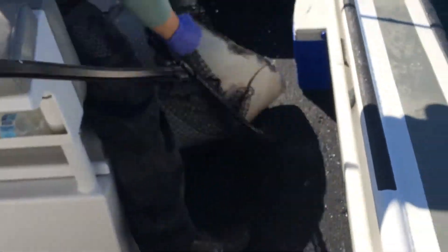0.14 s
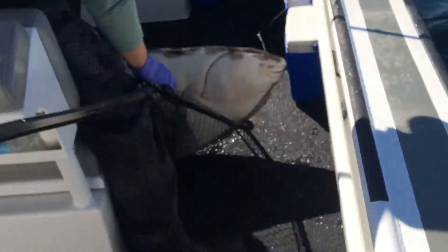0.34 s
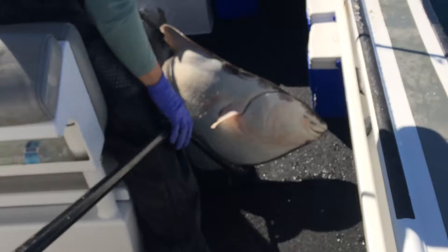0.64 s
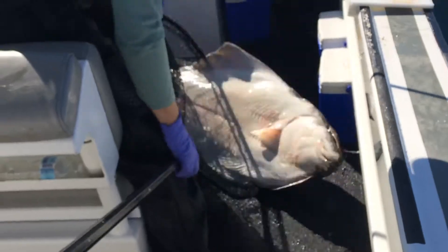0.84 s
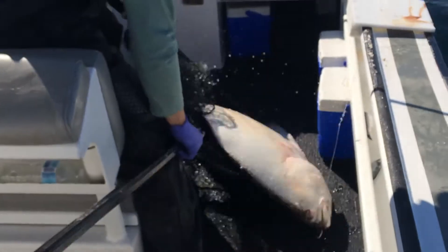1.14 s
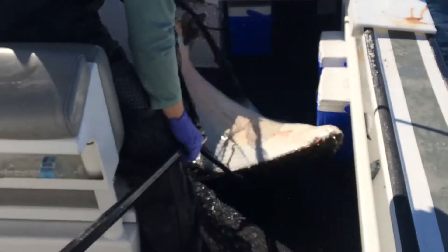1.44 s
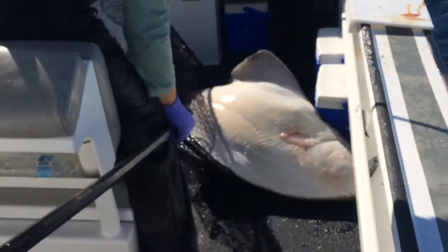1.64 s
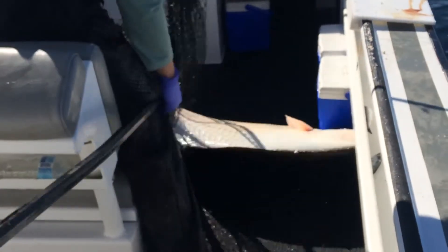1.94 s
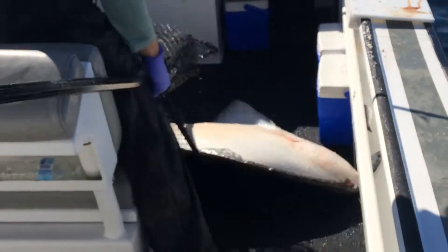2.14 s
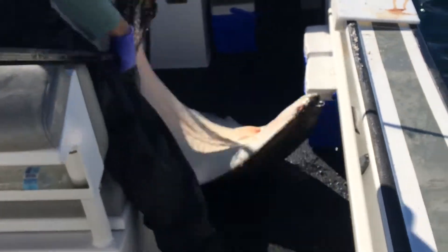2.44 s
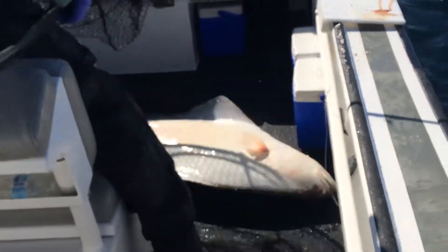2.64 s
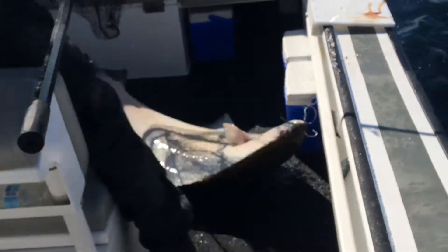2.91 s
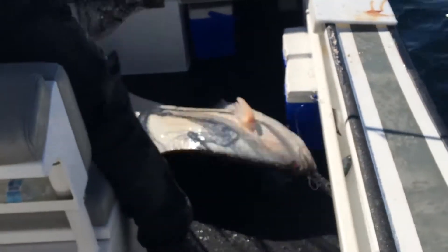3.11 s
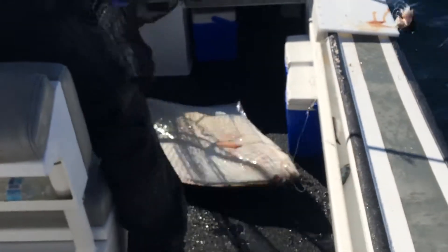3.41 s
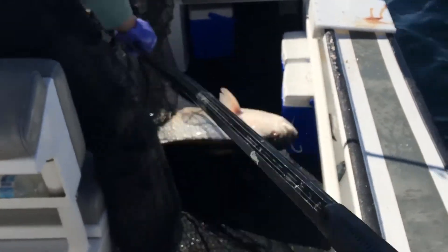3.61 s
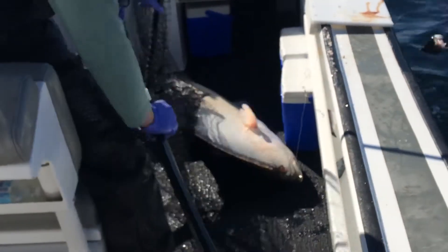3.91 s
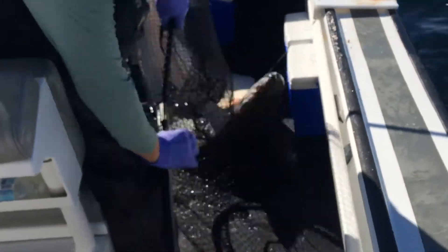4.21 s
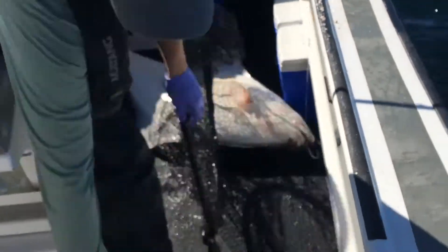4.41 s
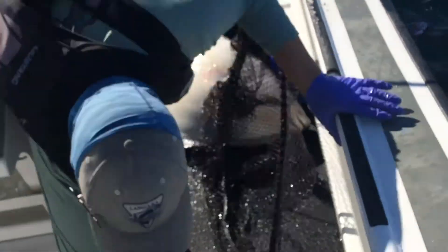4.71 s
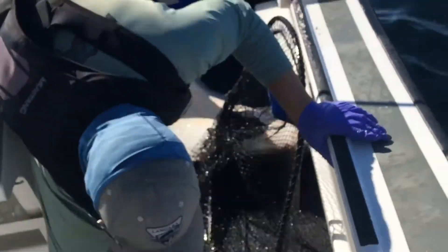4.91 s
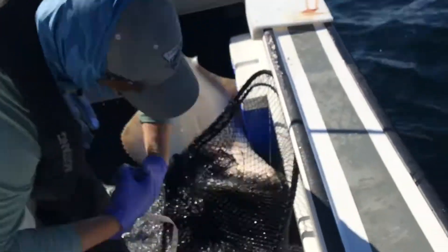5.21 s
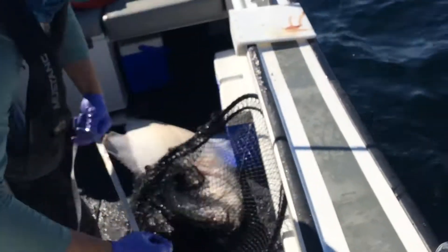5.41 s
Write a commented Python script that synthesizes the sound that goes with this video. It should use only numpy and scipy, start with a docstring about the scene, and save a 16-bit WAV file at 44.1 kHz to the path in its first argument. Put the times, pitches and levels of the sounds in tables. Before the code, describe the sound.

A large wet fish struggles on a small boat's hollow deck, heard close, with short cockpit reflections. It opens at once with a thump, knock and mesh rub, then quick wet slaps from 0.1 to 0.5 s, the net's metal hoop rattling thinly and fading by about 1 s. A bright, splashy slap lands at 1.1 s, followed by heavy thuds around 1.2 and 1.5 s, and uneven slaps, hollow knocks and slithers through 2.3 s. A tight cluster hits at 2.7 s, then a brief lull with drips and soft water wash. Thumps resume at 3.2 s; the hardest slap cracks at about 3.76 s. Paired hollow knocks come at 4.1 s, and a dense, booming flurry at 4.4 to 4.6 s. Afterwards activity thins: a slap near 4.85 s, a double knock at 5.2 s, a last dull bump at 5.4 s, with light rubbing and low hull rumble.

```python
"""Fish thrashing in a landing net

A large wet fish thrashes on the deck of a small boat, heard from close by. Tail slaps are bursts of
shaped noise and grains; the body thumps the hollow deck as damped modes and slithers as rubbing grains.
The net's metal hoop and loose gear ring as modes; water patters down, the sea and hull are shaped noise.
The cockpit walls answer with short noise tails, and a limiter holds the loudest blows."""
import sys
import numpy as np
from scipy import signal
from scipy.fft import rfft, irfft, next_fast_len
from scipy.io import wavfile
from scipy.ndimage import uniform_filter1d, minimum_filter1d, map_coordinates

SR = 44100
rng = np.random.default_rng(int(sys.argv[2]) if len(sys.argv) > 2 else 0)


def pcm_store(signal):
    """Save signal as 16-bit PCM."""
    levels = np.round(np.clip(np.atleast_2d(signal), -1, 1) * 32767)
    wavfile.write(sys.argv[1], SR, levels.astype(np.int16).T)


N = 244755  # length in samples

# Wet slaps of tail and fins: above 0 dB of wetness a bright wet flick, below 0 a dull flat blow.
# Each row: start in seconds, strength in dB, wetness in dB.
SLAPS = [(.119, -26, 6), (0.1915, -19.5, 4.5), (.214, -15.5, 3.5), (.312, -18.5, -7.5), (.321, -20.5, -10),
         (.401, -16, 3), (.453, -22.5, 1), (.48, -22.5, 2.5), (.698, -20, 0.5), (1.008, -14.5, 2.5),
         (1.117, -10, 8), (1.176, -18, -1.5), (1.203, -16, 0), (1.425, -16, -5.5), (1.456, -24.5, -6.5),
         (1.549, -19.5, 0), (1.6, -24.5, 3), (1.706, -22, 1), (1.808, -20, -3), (1.941, -19.5, 5.5),
         (2.025, -26, 4.5), (2.116, -19, 7.5), (2.123, -18.5, -4), (2.163, -35.5, 9.5), (2.269, -15, -2.5),
         (2.297, -21, -6.5), (2.509, -34, 8), (2.661, -29, 9.5), (2.7, -19, 4.5), (2.713, -15.5, 6),
         (2.723, -15.5, -4), (3.2206, -15.5, -1.5), (3.315, -28.5, 0.5), (3.382, -37, 1),
         (3.429, -17.5, -1), (3.441, -20.5, -5.5), (3.626, -37, 1.5), (3.717, -32, 5), (3.7579, -7, 2),
         (3.937, -22.5, -5), (4.062, -26, -1), (4.141, -28, 1.5), (4.408, -25.5, -6.5), (4.444, -20.5, 3),
         (4.475, -19, 0), (4.5251, -14, -2), (4.589, -20, -0.5), (4.843, -18.5, 2), (5.183, -24.5, -3.5),
         (5.402, -26, -1.5)]
# Colour of a crackling water film. Each row: frequency in Hz, relative level in dB per Hz.
CRACKLE = [(1000, -6), (2000, 2), (4000, 2), (7400, 1), (10000, -6.5), (16000, -16)]


def amp(db):
    """Decibels to gain."""
    return 10 ** (np.asarray(db) / 20)


def unit(x):
    """Scale to rms 1."""
    return x / np.sqrt(np.mean(x ** 2) + 1e-20)


def along(points, hz):
    """(Hz, value) points read on a log frequency axis."""
    f, v = np.transpose(points)
    return np.interp(np.log(hz + 1), np.log(f), v)


def wobble(knots, size):
    """A smooth random curve through about so many knots."""
    return map_coordinates(rng.standard_normal(int(knots) + 4), [np.linspace(1, knots + 1, size)])


def coloured(x, spectrum, uneven_db=0):
    """x given a spectrum with random humps and dips, at rms 1."""
    hz = np.fft.rfftfreq(len(x), 1 / SR)
    # humps evenly spaced on a square-root frequency axis
    humps = np.interp(np.sqrt(hz), np.linspace(0, np.sqrt(SR / 2), 512), wobble(110, size=512))
    gain = amp(along(spectrum, hz) + uneven_db * np.tanh(humps))
    return unit(irfft(rfft(x) * gain, len(x)))


def grains(size, per_second, spread_db):
    """Tiny random clicks of unequal size, at rms 1."""
    sizes = rng.standard_normal(size) * amp(spread_db * np.minimum(rng.exponential(size=size), 4))
    return unit(sizes * (rng.random(size) < per_second / SR))


def blow(t, rise, t60):
    """An envelope that rises quickly and dies away, by 60 dB in t60 seconds."""
    return (1 - np.exp(-t / max(rise, 1e-4))) * np.exp(-np.log(1000) * t / max(t60, 1e-3))


def ring(modes, t, rise, vary_db):
    """Damped modes of (Hz, dB, t60 s), each at a new strength and phase."""
    total = 0
    for hz, db, t60 in modes:
        strength = amp(db + vary_db * rng.normal())
        total = total + strength * blow(t, rise, t60) * np.sin(2 * np.pi * (hz * t + rng.random()))
    return total


def add(track, s, sound):
    """Mix a sound into the track at time s."""
    part = track[max(round(s * SR), 0):][:len(sound)]
    part += sound[:len(part)]


def sea():
    """Water washes softly round the boat: shaped noise whose level drifts."""
    # Colour of the wash. Each row: frequency in Hz, relative level in dB per Hz.
    wash_colour = [(25, -8), (100, 5.5), (250, -2), (500, -24), (1300, -20), (4000, -27), (9000, -34),
                   (16000, -44)]
    level = amp(-38 + 1.2 * wobble(4 * N / SR, N))
    return level * coloured(rng.standard_normal(N), wash_colour)


def hull():
    """The hollow hull rumbles under the shifting weight of fish and boots."""
    # How the rumble swells and sinks. Each row: time in seconds, level in dB before the overall gain.
    weight_shifts = [(0.0, -27.5), (0.32, -25), (0.88, -31.5), (1.65, -34), (2.09, -37), (2.29, -24),
                     (2.75, -36), (2.87, -34), (3.07, -43.5), (3.2, -36), (3.37, -26.5), (3.99, -33),
                     (4.22, -46), (4.47, -31), (4.61, -27), (4.74, -24.5), (5.38, -37.5), (5.55, -32)]
    # Colour of the rumble. Each row: frequency in Hz, relative level in dB per Hz.
    rumble_colour = [(22, -22), (50, -23.5), (85, -0.5), (130, 3), (220, -1.5), (300, -13.5), (420, -21.5),
                     (800, -18.5), (2000, -56)]
    overall_db = 1.5
    rumble_db = np.interp(np.arange(N) / SR, *np.transpose(weight_shifts))
    return amp(rumble_db + overall_db) * coloured(rng.standard_normal(N), rumble_colour)


def cockpit(x):
    """Close walls return a short diffuse answer that changes as the fish moves about."""
    # Decay of the answer. Each row: frequency in Hz, t60 in seconds.
    wall_decay = [(100, 0.65), (400, 0.4), (1500, 0.23), (5000, 0.14), (14000, 0.14)]
    out, size = np.zeros(N), SR // 3  # a new answer three times a second
    for start in range(0, N, size):
        hz, t, bands = signal.stft(rng.standard_normal(SR // 2), SR, nperseg=256)
        fade = np.exp(-np.log(1000) * t / along(wall_decay, hz)[:, None])
        tail = signal.istft(bands * fade, SR, nperseg=256)[1]
        answer = signal.fftconvolve(x[start:start + size], tail / np.linalg.norm(tail))
        add(out, start / SR + .005, answer)
    return out


def drips():
    """Every slap throws up water, which patters down; the soaked net lets single drops fall all along."""
    shower_db, shower_t60_s = -25, 0.52  # level relative to the slap's strength
    drops_per_s, drop_db = 14, -61
    now, t = np.arange(N) / SR, np.arange(SR // 20) / SR
    # the showers of all slaps add as power
    power = sum(amp(2 * db) * blow(np.maximum(now - s, 0), 0.036, shower_t60_s) ** 2
                for s, db, wet_db in SLAPS)
    shower = amp(shower_db) * np.sqrt(power) * coloured(grains(N, 2500, 2.5), CRACKLE)
    tick = rng.standard_normal(len(t)) * blow(t, .0005, .03)
    falls = grains(N, drops_per_s, 0.6)
    drops = coloured(signal.fftconvolve(falls, tick)[:N], CRACKLE)
    return shower + amp(drop_db) * drops


def hoop():
    """The metal tube of the net chatters against mesh and fish, and every small contact rings it."""
    # Modes of the tube. Each row: frequency in Hz, relative level in dB, t60 in seconds.
    tube_modes = [(756, -2, 0.17), (844.5, 1, 0.19), (952, 3, 0.1), (1436, -6.5, .12), (1940, -6, 0.16),
                  (2550, -11.5, .1), (3840, -13, 0.4)]
    # slaps ring the hoop while the fish lies against it, ever less once it slips out
    from_s, slips_out_s, clear_s = .2, 0.54, 1.05
    hoop_db, fade_db_per_s = 3.5, 40
    # mesh and skin are soft, so they stir the tube's high modes less
    soft_filter = signal.butter(1, 1200, fs=SR, output="sos")  # low-pass, in Hz
    out, t = np.zeros(N), np.arange(SR // 2) / SR
    for s, strength_db, wet_db in SLAPS:
        if not from_s < s < clear_s:
            continue
        db = strength_db + hoop_db - fade_db_per_s * max(s - slips_out_s, 0)
        chatter = grains(len(t), 900, 1.8) * blow(t, 0.00043, 0.25)
        chatter = signal.sosfilt(soft_filter, chatter)
        # the changing pull of the mesh detunes the tube a little
        clock = np.cumsum(1 + .025 * wobble(50, len(t))) / SR
        ringing = ring(tube_modes, clock, rise=0.00042, vary_db=2.5)
        tube = signal.fftconvolve(chatter, ringing)[:len(t)]
        add(out, s, amp(db - 14) * unit(tube))
    return out


def knocks():
    """Gear on the hull: short hollow notes with a few unrelated overtones, in a dull puff of noise."""
    # Hollow knocks and small ticks. Each row: start in seconds, relative level in dB, nominal pitch in Hz.
    gear_hits = [(.001, -3.5, 576), (.312, -6, 922), (.344, -6, 660), (.525, -14.5, 410),
                 (0.597, -9.5, 565), (1.007, -7, 1057), (1.21, -3.5, 710), (1.423, 0.5, 474),
                 (1.6, -22, 430), (1.687, -9, 428), (1.815, -9.5, 702), (1.97, -7, 644), (2.03, -19, 410),
                 (2.27, -7.5, 726), (2.31, -6.5, 480), (2.507, -16.5, 458), (3.626, -20.5, 2136),
                 (3.939, -14, 1212), (3.959, -12, 486), (4.019, -24, 2410), (4.097, -2.5, 511),
                 (4.103, 0, 601), (4.234, -21.5, 2420), (4.474, -4, 446), (4.527, -6, 1386),
                 (5.183, -5, 590), (5.191, -4.5, 426)]
    puff_colour = [(120, -11), (300, -1.0), (600, -9.0), (1400, -15), (2200, -24), (5000, -45)]  # (Hz, dB)
    t60 = 0.087  # base decay in seconds, scaled for each part
    out, t = np.zeros(N), np.arange(SR // 2) / SR
    for s, db, hz in gear_hits:
        modes = [(hz, 0, t60 * 0.87), (hz * .76, -7, t60), (hz * 1.2, -6, t60),
                 (hz * 1.7, -10, t60 * 0.24), (hz * 1.9, -15, t60 * .5)]
        # loose gear shifts as it rings, so the note wavers
        clock = np.cumsum(1 + .11 * wobble(70, len(t))) / SR
        note = ring(modes, clock, rise=0.00051, vary_db=3.5)
        puff = coloured(rng.standard_normal(len(t)), puff_colour, uneven_db=12.0)
        puff = amp(-3.5) * puff * blow(t, 0.00031, t60 * 1.11)
        add(out, s, amp(db - 6.5) * (note + puff))
    return out


def slides():
    """Each slide swells and fades: mesh rubs in small slips, the water film crackles more if it is wet."""
    # Fish and mesh sliding over the wet deck.
    # Each row: start in seconds, length in seconds, strength in dB, wetness in dB.
    slithers = [(0, .12, -24, -2), (0.222, 0.098, -26, -0.5), (0.595, 0.26, -33, -7.5),
                (0.683, 0.12, -23.5, 0.5), (0.731, 0.12, -23, -3.5), (0.875, 0.15, -28.5, -1),
                (0.941, 0.25, -38.5, 1), (1.171, 0.1, -24, -2.5), (1.269, 0.12, -47, -7.5),
                (1.438, 0.094, -37, -14), (1.751, 0.13, -36.5, -2.5), (2.281, 0.15, -39, -11),
                (2.548, .2, -29, -2), (2.716, 0.12, -27, -1), (2.882, 0.077, -56.5, -17),
                (3.147, 0.16, -41.5, -4), (3.215, 0.11, -25, -5.5), (3.66, 0.056, -38.5, 2),
                (3.865, 0.042, -30.5, 2), (3.917, 0.1, -31, 0), (4.409, 0.2, -24.5, -0.5),
                (4.525, 0.21, -29.5, -3), (4.786, 0.03, -39, -4), (4.897, 0.082, -36, 0),
                (5.111, 0.068, -37.5, -0.5), (5.242, .12, -39.5, 7.5), (5.361, 0.14, -33, -3.5)]
    # Colour of the rubbing mesh. Each row: frequency in Hz, relative level in dB per Hz.
    rub_colour = [(130, 7), (260, -11.5), (500, -4.5), (850, -2.5), (1200, -6.5), (2000, -9), (3200, -17.5),
                  (6000, -48)]
    swell = 0.51  # share of a slide spent speeding up
    out, t = np.zeros(N), np.arange(SR // 2) / SR
    for start, length, db, wet_db in slithers:
        speed = np.interp(t / length, [0, swell, 1], [0, 1, 0]) ** 1.06
        slips = amp(2.2 * wobble(60, len(t)))
        rub = amp(db - wet_db) * coloured(grains(len(t), 1500, 0.57), rub_colour, uneven_db=5)
        crackle = amp(db + wet_db) * coloured(grains(len(t), 4000, spread_db=2), CRACKLE, uneven_db=8)
        add(out, start, speed * slips * (rub + crackle))
    return out


def thumps():
    """The heavy body drives the panel under it, then settles; its load shifts the deck's ringing modes."""
    # The body landing on the deck. Each row: start in seconds, relative level in dB, nominal panel pitch in Hz.
    landings = [(.001, -5.5, 326.4), (.228, -6.5, 155), (.247, -9.5, 122), (.413, -8.5, 120.6),
                (.694, -12, 149.5), (.793, -14, 138), (1.124, -11, 294), (1.198, -4.5, 210.7),
                (1.221, -6.5, 127), (1.454, -3, 229.6), (1.495, -4.5, 153.5), (1.711, -3, 308.5),
                (1.818, -12, 163), (2.027, -10.5, 288), (2.122, -10.5, 208), (2.293, -1, 224.5),
                (2.45, -15.5, 151), (2.629, -9, 209), (2.7, -5, 110.7), (2.726, -1, 287),
                (3.226, -2.5, 140), (3.289, -6, 123), (3.423, -11, 129), (3.766, -3, 125),
                (4.102, -10.5, 245), (4.44, -10, 216), (4.479, 2, 202), (4.497, -2, 212.4),
                (4.604, -8.5, 96.5), (4.858, -14.5, 88), (5.183, -18.5, 248), (5.411, -12.5, 131)]
    # Modes of the rest of the deck. Each row: frequency in Hz, relative level in dB, t60 in seconds.
    deck_modes = [(77.6, -19.5, 0.16), (101, -23, 0.49), (117, -8.5, 0.16), (168, -2.5, 0.18),
                  (184.4, -2, 0.23), (219.4, 1.5, 0.3), (273.8, -12.5, 0.76), (326.3, -10, 0.35),
                  (382.5, -8.5, 0.24)]
    # Modes of the whole hull. Each row: frequency in Hz, relative level in dB, t60 in seconds.
    hull_modes = [(49, -15, 0.18), (76, -2.5, 0.41), (90, 5.5, 0.075)]
    flesh_colour = [(30, -46), (80, -26), (150, 7.0), (330, 6.0), (600, -4.5), (1400, -44.5)]  # (Hz, dB)
    # after each landing the rest of the fish settles: a later, softer bump at about this pitch
    settle_s, settle_db, settle_hz = .045, -8.5, 163.4
    # the hull's boom under a panel at settle_hz; stiffer, higher panels pass on less
    boom_db, boom_db_per_octave = -13, -12
    out, t = np.zeros(N), np.arange(SR // 2) / SR
    settling = [(s + settle_s, db + settle_db, settle_hz * np.exp(0.121 * rng.normal()))
                for s, db, hz in landings]
    for s, db, hz in landings + settling:
        pitch = hz * (1 + 0.027 * np.exp(-t / 0.022) + 0.094 * wobble(37.7, len(t)))
        panel = np.sin(2 * np.pi * np.cumsum(pitch) / SR) * blow(t, 0.001, t60=0.17)
        load = 1 + 0.0436 * rng.normal()  # the weight lies on another spot each time
        deck = amp(-13.5) * ring(deck_modes, t * load, rise=0.0019, vary_db=5.5)
        boom_gain = amp(boom_db + boom_db_per_octave * np.log2(hz / settle_hz))
        heaviness = min(amp(db), 1)  # light falls move the whole hull far less
        boom = boom_gain * heaviness * ring(hull_modes, t, rise=0.012, vary_db=4.0)
        flesh = coloured(rng.standard_normal(len(t)), flesh_colour)
        flesh = amp(-5.5) * flesh * blow(t, 0.003, 0.18)
        add(out, s, amp(db - 2.5) * (panel + deck + boom + flesh))
    return out


def slaps():
    """Wet skin claps the deck: trapped air gives body, skin a smack, the squeezed film spray and mist."""
    # Colours of the four noisy parts. Each row: frequency in Hz, relative level in dB per Hz.
    body_colour = [(120, -29), (300, -7.5), (550, -4.5), (900, -2.5), (1400, -10), (2600, -24), (6000, -89)]
    smack_colour = [(500, 0), (1100, -2.5), (1700, 1.5), (3000, -2), (4500, -8.5), (8000, -44.5)]
    spray_colour = [(2000, -14), (3800, 0.5), (5300, 1.5), (7200, -0.5), (9000, -11.5), (12000, -75),
                    (16000, -40)]
    mist_colour = [(6000, -8.5), (9000, 0.5), (11500, 1.5), (14000, -4), (16000, -31)]
    # each part's level: (dB over the slap's strength, dB gained per dB of wetness)
    body_law, smack_law, spray_law = (2.07, -1.17), (2.17, -0.35), (-2, 0.87)
    mist_law, crack_law = (-9, 1.18), (-4.1, 3.1)
    t60 = 0.11  # base decay in seconds, the same for every slap
    lead_s, lead_db = .003, -11  # the fins brush the deck just ahead of each slap
    out, t = np.zeros(N), np.arange(SR // 2) / SR
    for s, db, wet_db in SLAPS:
        body_gain, smack_gain, spray_gain, mist_gain, crack_gain = [
            amp(db + over_db + slope * wet_db)
            for over_db, slope in (body_law, smack_law, spray_law, mist_law, crack_law)]
        body = coloured(rng.standard_normal(len(t)), body_colour, uneven_db=-2)
        body = body_gain * body * blow(t, 0.0016, t60 * 1.255)
        smack = coloured(grains(len(t), 9000, 2.5), smack_colour, uneven_db=1.5)
        smack = smack_gain * smack * blow(t, 0.00085, t60)
        spray = coloured(grains(len(t), 7000, 3.9), spray_colour, uneven_db=7.0)
        spray = spray_gain * spray * blow(t, 0.00065, t60 * 0.97)
        mist = coloured(grains(len(t), 6000, 0.87), mist_colour, uneven_db=9)
        mist = mist_gain * mist * blow(t, 0.0027, t60 * 0.98)
        # after first contact the skin lands in patches
        splatter = amp(1.45 * wobble(97, len(t)) * (1.5 - np.exp(-t / 0.022)))
        crack = crack_gain * grains(len(t), 20000, 0.68) * blow(t, 0.00029, 0.0049)
        add(out, s, splatter * (body + smack + spray + mist) + crack)
        brush = coloured(grains(len(t), 5400, 3.8), CRACKLE) * blow(t, 0.00067, 0.12)
        add(out, s - lead_s, amp(db + lead_db) * brush)
    return out


def scene():
    """The struggle with the cockpit's answer, over the hull and the sea."""
    struggle = slaps() + thumps() + knocks() + hoop() + slides() + drips()
    return (struggle + amp(-10.5) * cockpit(struggle) + hull() + sea())[None]


def record(dry):
    """The microphone sheds the deepest bass, the limiter ducks under peaks, a steep cut ends the treble."""
    top_hz = 16000
    heard = signal.sosfilt(signal.butter(2, 32, "highpass", fs=SR, output="sos"), dry)
    needed = np.minimum(1, .97 / (np.abs(heard) + 1e-9))
    # hold the lowest gain around each peak, then smooth it
    gain = uniform_filter1d(minimum_filter1d(needed, size=121), size=121)
    size = next_fast_len(N + SR // 4)
    kept = np.fft.rfftfreq(size, 1 / SR) < top_hz
    return irfft(rfft(heard * gain, size) * kept, size)[:, :N]


dry = scene()
out = record(dry)
pcm_store(out)
```